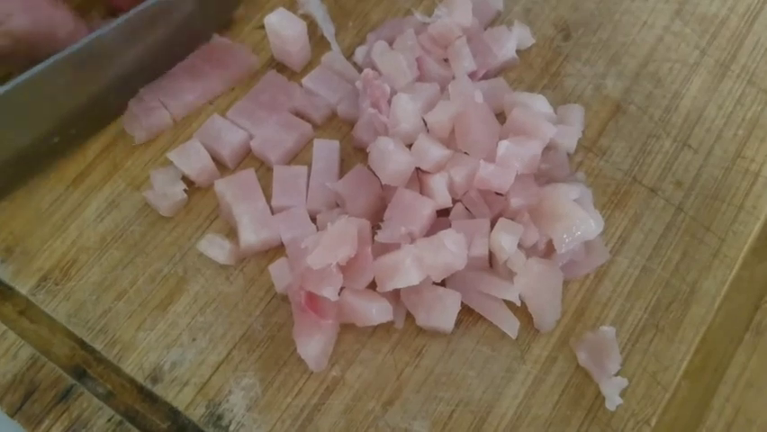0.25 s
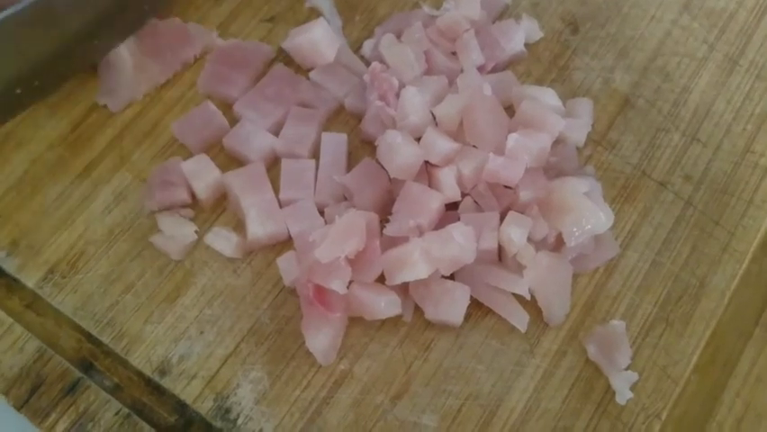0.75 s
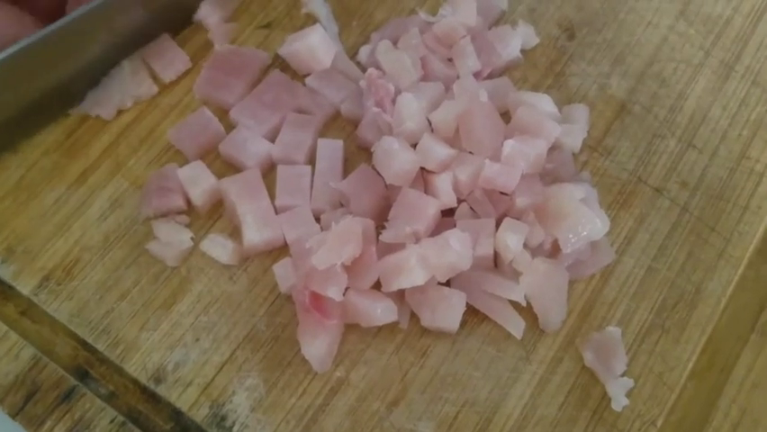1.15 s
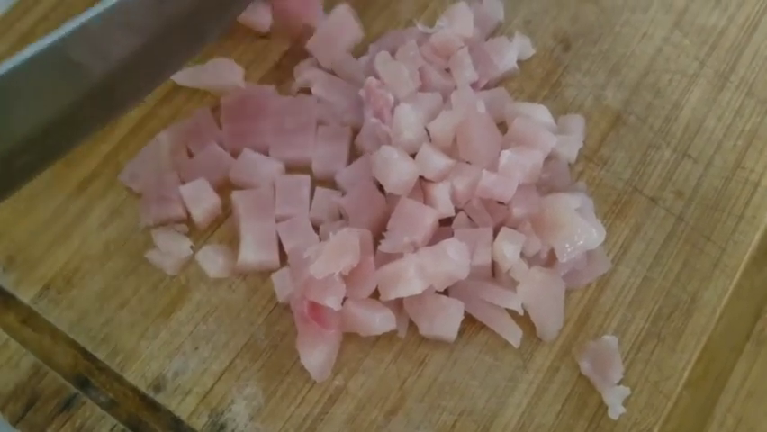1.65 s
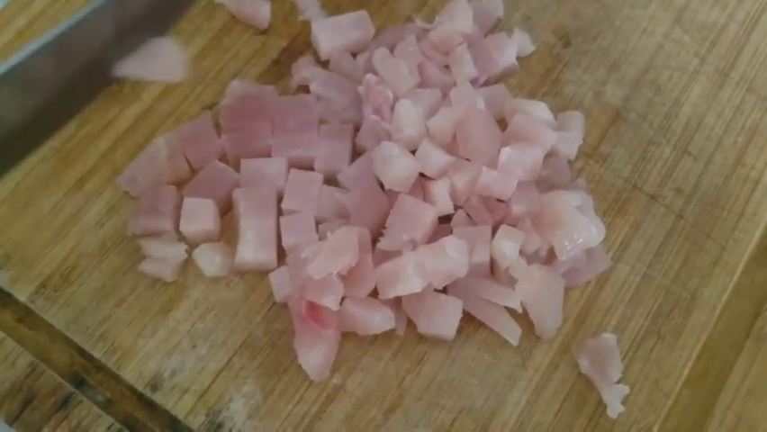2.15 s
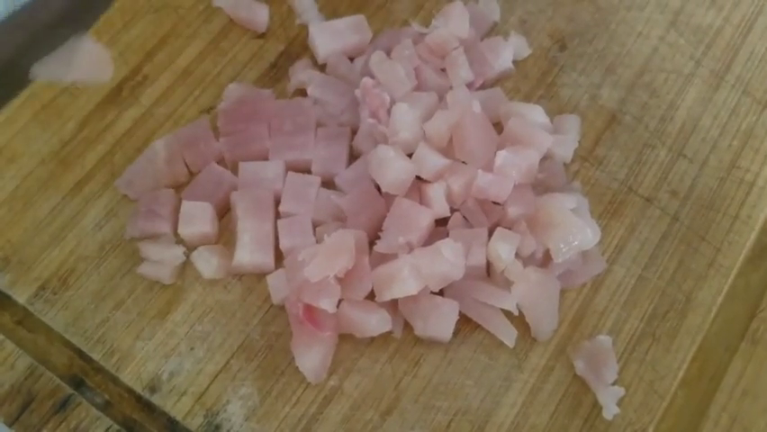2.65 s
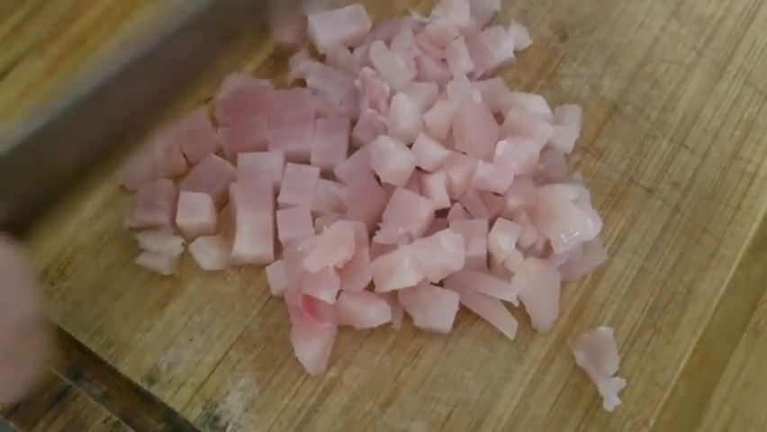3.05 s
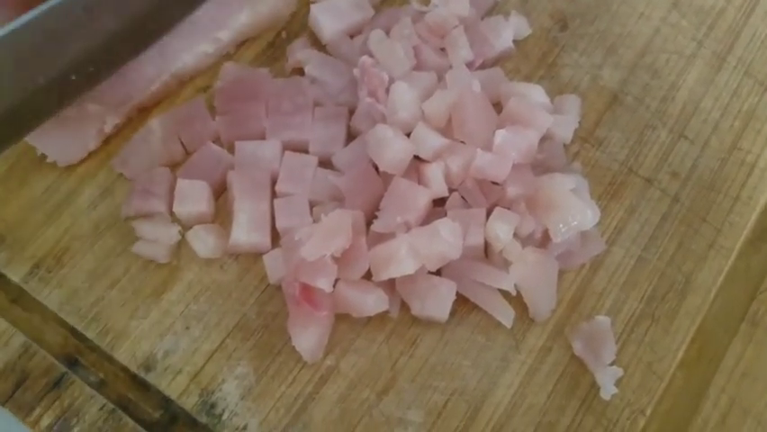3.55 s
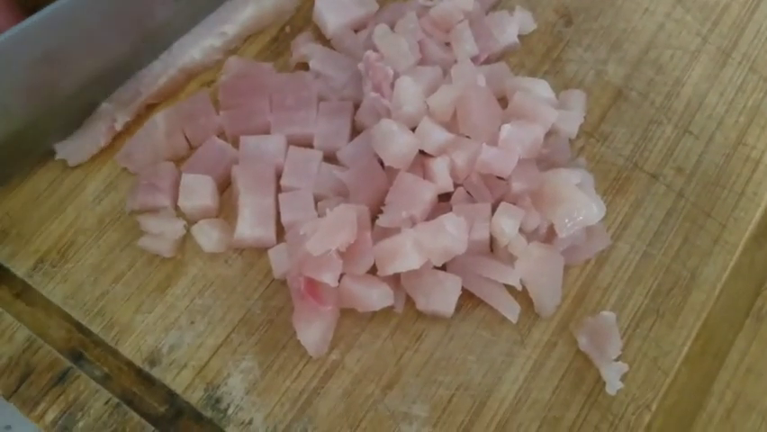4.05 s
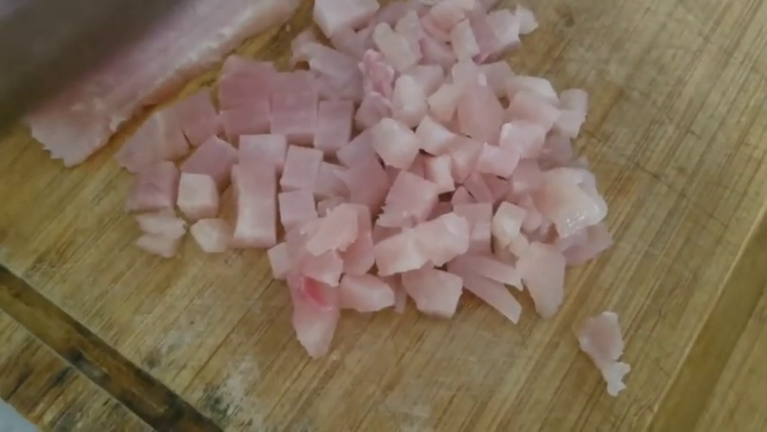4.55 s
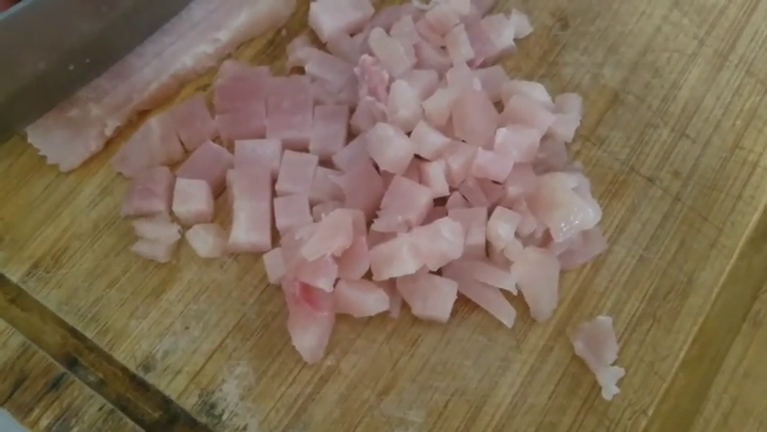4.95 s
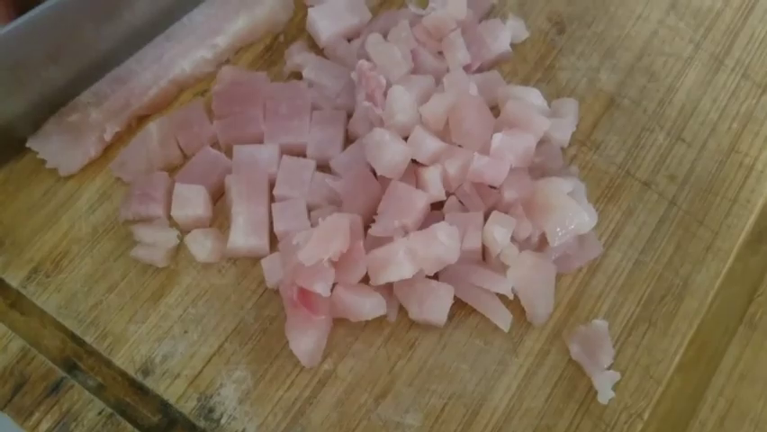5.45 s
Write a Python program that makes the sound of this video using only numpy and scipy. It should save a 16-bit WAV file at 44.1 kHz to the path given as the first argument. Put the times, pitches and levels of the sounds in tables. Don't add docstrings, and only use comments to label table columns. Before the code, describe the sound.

Very close stereo pickup of a knife cutting raw meat on a wooden board in a small kitchen. Light slides and taps come first, a firm chop near two seconds, smaller ones after it, then a near-quiet lull. Two loud woody knocks follow around four and five seconds, each led in by a rasping, wet drag. Low appliance rumble, thin hiss and a faint far bird stay behind.

```python
import sys
import numpy as np
from scipy import signal
from scipy.fft import rfft, irfft, next_fast_len
from scipy.io import wavfile
from scipy.ndimage import uniform_filter1d, minimum_filter1d

SR = 44100
rng = np.random.default_rng(int(sys.argv[2]) if len(sys.argv) > 2 else 0)


def ratio(d):
    e = np.asarray(d, float) / 20
    return 10 ** e


def to_wav(sig):
    pcm = np.clip(np.atleast_2d(sig), -1, 1) * 32767
    pcm = np.round(pcm).astype(np.int16)
    wavfile.write(sys.argv[1], SR, pcm.T)


N = 250840


def evened(x):
    return x / np.sqrt(np.mean(x ** 2) + 1e-20)


def read(points, hz):
    f, value = np.transpose(points)
    return np.interp(np.log(hz + 1), np.log(f + 1), value)


def add(mix, s, sound):
    part = mix[..., round(s * SR):][..., :sound.shape[-1]]
    part += sound[..., :part.shape[-1]]


def noise_pair(count, likeness, level_db, size=512):
    hz = np.fft.rfftfreq(size, 1 / SR)[:, None]
    t = np.arange(count * 4 // size + 5) * size / 4 / SR
    a, b, c, d = rng.standard_normal((len(t), len(hz), 4)).T
    same = np.clip(read(likeness, hz), -1, 1)
    left = a + 1j * b
    right = same * left + np.sqrt(1 - same ** 2) * (c + 1j * d)
    spectra = np.array([left, right]) * ratio(level_db(hz, t))
    return signal.istft(spectra, nperseg=size, noverlap=size * 3 // 4)[1][:, :count]


# f/Hz, level/dB per Hz
AIR_COLOUR = [(25, -4.5), (50, 0.5), (75, 0), (150, -3.5), (300, -3), (450, -7.5), (600, -11.5),
              (1500, -14), (2500, -18), (3700, -26.5), (5500, -25), (7500, -19), (9200, -31.5),
              (15500, -25.5)]
# f/Hz, likeness (-1 to 1)
AIR_LIKENESS = [(60, 1), (130, 0.89), (290, 0.91), (640, 0.097), (1410, -0.28), (3100, 0.22), (6820, -0.15),
                (15000, 0.11)]
# f/Hz, width/Hz, left level/dB over the air, right level/dB over the air
HUM_BANDS = [(100.9, 20.4, 12, 15), (192, 30, -0.5, 7), (397.4, 43, 9, 9.5), (443, 29, 3.5, 13),
             (4420, 1100, 3.5, 3), (4870, 410, 6, 7.5), (5930, 71, -9, 7), (7053, 317, 5, 13.5),
             (8800, 230, 7, 7), (10900, 1570, 7, 20), (11500, 224, -25, -15), (12600, 1200, 1, 8),
             (14200, 380, 0, 7.5), (14660, 600, 0, 13.5)]


def air():
    def level_db(hz, t):
        f, width, *lift = np.transpose(HUM_BANDS)
        bands = (np.array(lift)[:, None] / (1 + (2 * (hz - f) / width) ** 2)).sum(axis=2)
        patches = uniform_filter1d(rng.standard_normal((len(t), len(hz))), size=10, axis=0)
        waver_db = 1.57 * evened(uniform_filter1d(patches, size=12, axis=1)).T
        return read(AIR_COLOUR, hz) + bands[:, :, None] + waver_db

    pair = noise_pair(count=N, likeness=AIR_LIKENESS, level_db=level_db, size=2048)
    return ratio(-46.5) * evened(pair)


# t/s, length/s, first f/Hz, last f/Hz, level/dB
WHISTLES = [(0.094, 0.12, 4420, 4500, -66), (0.668, .16, 4470, 4370, -68),
            (1.367, 0.085, 4170, 4420, -64.5), (1.46, 0.089, 4460, 4500, -65.5),
            (2.54, .06, 4200, 4230, -66), (3.09, .07, 4540, 4540, -69), (3.3, .12, 4180, 4250, -64),
            (3.45, .2, 4350, 4540, -66), (3.537, 0.16, 5930, 6230, -65), (4.2, .16, 4420, 4500, -71),
            (4.68, .12, 5420, 5560, -68)]


def bird():
    out = np.zeros(N)
    for s, length, first_hz, last_hz, db in WHISTLES:
        hz = np.linspace(first_hz, last_hz, round(length * SR))
        flutter_db = 2.5 * evened(uniform_filter1d(rng.standard_normal(len(hz)), size=900))
        tone = np.sin(2 * np.pi * np.cumsum(hz) / SR)
        add(out, s, ratio(db + flutter_db) * tone * signal.windows.tukey(len(hz), .3))
    return out


# f/Hz, likeness (-1 to 1)
NEAR_LIKENESS = [(60, .97), (200, .85), (400, .65), (850, .88), (1300, .65), (2400, -.2), (4400, .1),
                 (15000, .05)]
# f/Hz, fade time/s
ROOM_FADE = [(150, 0.23), (400, 0.34), (900, 0.19), (2000, 0.28), (5000, 0.25), (12000, 0.098)]


def kitchen(gap_s=.003):
    def fade_db(hz, t):
        return -60 * t / read(ROOM_FADE, hz)

    tail = noise_pair(count=16000, likeness=NEAR_LIKENESS, level_db=fade_db, size=256)
    return np.pad(tail / np.linalg.norm(tail[0]), ((0, 0), (round(gap_s * SR), 0)))


def echo(sound, room, db):
    return ratio(db) * signal.oaconvolve(sound.mean(axis=0)[None], room, axes=1)[:, :N]


# t/s, level/dB, f/Hz,
# length/ms
SNAPS_AND_SQUEAKS = [(.868, -45, 13600, 12), (.923, -49, 5700, 8), (1.151, -25, 1367, 24), (1.176, -21, 342, 27),
                     (1.192, -23.5, 345, 21), (1.171, -46, 4200, 20), (1.805, -45, 4090, 26),
                     (1.806, -40, 12600, 6.5), (1.806, -44, 15200, 6), (1.819, -47, 4250, 20),
                     (1.819, -39, 12600, 8.7), (1.82, -22, 16700, 13), (2.956, -46, 5900, 6),
                     (2.413, -44, 14500, 4), (2.224, -47, 3050, 9), (3.015, -47, 12400, 18),
                     (3.195, -54, 12500, 15), (3.353, -48, 12900, 12), (3.56, -57, 11500, 12)]


def snaps():
    out, t = np.zeros((2, N)), np.arange(4000) / SR
    for s, db, hz, ms in SNAPS_AND_SQUEAKS:
        noise = rng.standard_normal((2, len(t)))
        puff = 0.99 + evened(uniform_filter1d(noise, size=int(8 * SR / hz)))
        onset = np.minimum(t * hz / 4, 1)
        fade = ratio(db - 20 * 1000 * t / ms)
        add(out, s, fade * onset * puff * np.sin(2 * np.pi * hz * t))
    return out


# t/s, level/dB, highest f/Hz
EDGE_TICKS = [(0.441, -58, 3000), (1.7907, -36, 4500), (2.168, -33.5, 5240), (2.224, -63, 4000),
              (2.4123, -35, 4600), (3.193, -51, 4500), (3.2516, -45.5, 3600), (3.56, -58, 4000),
              (3.895, -28.5, 4200), (4.474, -45, 4000), (4.8, -41, 4140)]


def ticks(room):
    out, t = np.zeros((2, N)), np.arange(1200) / SR
    for s, db, top_hz in EDGE_TICKS:
        crack = rng.standard_normal((2, len(t))) * ratio(-60 * t / 0.041)
        crack = signal.sosfilt(signal.butter(3, [2500, top_hz], "band", fs=SR, output="sos"), crack)
        add(out, s - .0005, ratio(db + 5.5) * crack / abs(crack).max())
    return out + echo(out, room, db=-7)


# f/Hz, level/dB, time to fade by 60 dB/s, left-right level/dB
BOARD_MODES = [(100.4, -9.5, 0.2, -5), (194.4, -3, 0.15, 4), (264, 5, 0.063, -9.5), (342.3, 8, 0.081, 6),
               (404, -1.5, 0.18, -13), (635, -15, .07, 3), (785, -8, .06, 3), (852, -4, .13, 4),
               (884, -3, .12, 3), (1000, -10, .06, -2), (1240, -27, 0.065, 2), (1287, 10, 0.01, 16.5),
               (1422, 9, 0.026, -3), (1503, 1, 0.046, 19), (1698, 1.5, 0.036, -15),
               (1789, -4.5, 0.037, -10.5), (2077, 3, 0.009, 21.5), (2353, -8.5, 0.03, -6.5)]
GROUP_TOPS = [550, 1100, 1780]


def board(spot_db):
    hz, db, t60, pan = np.transpose(BOARD_MODES)[:, :, None]
    t = np.arange(8000) / SR
    lag = np.array([0, .00005])[:, None, None]
    sides = ratio(np.array([.5, -.5])[:, None, None] * pan)
    fade = ratio(db + spot_db[:, None] - 60 * t / t60)
    rings = fade * np.sin(2 * np.pi * hz * np.maximum(t - lag, 0))
    flips = (-1) ** np.arange(len(hz))[:, None]
    rings *= np.where(hz > GROUP_TOPS[1], flips, 1)
    member = np.searchsorted(GROUP_TOPS, hz[:, 0]) == np.arange(4)[:, None]
    return -np.einsum("gm,cmt->gct", member, sides * rings)


# hardest t/s, pressure level/dB, lean-in/s, let-go/s, wetness level/dB
BLADE_STROKES = [(.1, -44, .11, 0.044, -8), (.25, -51.5, 0.044, 0.026, 13), (.868, -51, 0.031, 0.027, 10),
                 (.95, -41, 0.1, 0.076, -8), (1.085, -42.5, 0.072, 0.11, -9),
                 (1.174, -31, 0.041, 0.044, -2), (1.785, -44, 0.032, .01, -8),
                 (1.795, -34.5, 0.0088, .015, 3), (1.81, -42, .012, 0.059, 6),
                 (2.166, -48.5, 0.027, 0.036, -8), (2.228, -49, 0.015, 0.0098, 0),
                 (2.393, -49, 0.0086, 0.026, 6), (3.21, -62, 0.059, .03, 9), (3.255, -53.5, 0.04, 0.13, -4),
                 (3.825, -38.5, 0.092, 0.067, 1.5), (3.891, -30.5, 0.091, 0.031, -1.5),
                 (4.056, -36, 0.075, .14, -2), (5.02, -42.5, 0.082, .05, 3),
                 (5.081, -29.5, 0.13, 0.048, -5.5), (5.253, -37.5, 0.16, .15, -5)]


def pressure():
    rub_db = -59.5
    t, level = np.arange(N) / SR, np.zeros((4, N))
    for s, db, lean, let_go, wet_db in BLADE_STROKES:
        on = (t > s - 2 * lean) & (t < s + 2 * let_go)
        away = np.where(t[on] < s, (s - t[on]) / lean, (t[on] - s) / let_go)
        tops_db = [db,
                   rub_db + 0.21 * (db - rub_db),
                   db - 6 + 0.16 * wet_db,
                   db - 8.5 + wet_db]
        swell_db = 22.5 * away ** 1.245
        level[:, on] += ratio(2 * (np.array(tops_db)[:, None] - swell_db))
    return np.sqrt(level)


# f/Hz, level/dB per Hz
RASP_COLOUR = [(1900, -40), (2500, 2.5), (3000, 3.5), (3500, 4.5), (4000, 1.5), (5000, -4.5), (6000, -2.5),
               (7200, -5.5), (8000, -4.5), (9000, -20)]
# f/Hz, width/Hz, level/dB
BLADE_MODES = [(3110, 170, -1), (3530, 120, 0), (4200, 120, -2), (4800, 120, -3), (5160, 150, -1),
               (5950, 200, -1.5), (7640, 260, -4.5)]


def rasp_db(hz, t):
    lift_db, chatter_db = 5, 2.5
    f, width, top_db = np.transpose(BLADE_MODES)
    patches = uniform_filter1d(rng.standard_normal((len(t), len(hz))), size=6, axis=0)
    patches = uniform_filter1d(patches, size=5, axis=1)
    blade = ((lift_db + top_db) / (1 + (2 * (hz - f) / width) ** 2)).sum(axis=1)
    return read(RASP_COLOUR, hz) + blade[:, None] + chatter_db * evened(patches).T


# f/Hz, level/dB per Hz
FIZZ_COLOUR = [(7500, -21), (9300, -1.5), (10500, 1.5), (12700, 6), (14000, 2), (15500, 4)]


def fizz_db(hz, t):
    return read(FIZZ_COLOUR, hz) + 0 * t


def strokes(room):
    level = uniform_filter1d(pressure(), size=220)
    sizes = ratio(2.0 * np.minimum(rng.exponential(1, N), 5))
    happens = rng.random(N) < 1600 / SR
    slips = sizes * happens * rng.choice([-1, 1], N)
    grit = evened(uniform_filter1d(abs(slips), size=40)) + 2.1
    thud, main, upper, top = board(np.zeros(len(BOARD_MODES)))
    ringing = main + ratio(-4.5) * upper + ratio(1.0) * top
    out = 0
    for drive, ring in ((level[0], ringing), (level[1], np.diff(thud))):
        push = (drive * evened(slips))[None]
        out = out + signal.oaconvolve(push, ring / np.linalg.norm(ring[0]), axes=1)[:, :N]
    for drive, colour_db in ((level[2], rasp_db), (level[3], fizz_db)):
        hiss = noise_pair(count=N, likeness=NEAR_LIKENESS, level_db=colour_db)
        out = out + drive * evened(grit) * evened(hiss)
    return out + echo(out, room, db=-8)


# t/s, blow level/dB, then thud, upper modes and top modes as level/dB over the blow
EDGE_CHOPS = [(0.441, -43, -3, -6.5, -4), (1.7916, -11.5, -10, -6.5, -12), (2.168, -35, -3, -6.5, -10),
              (2.224, -48.5, 10, 3, 6), (2.414, -20.5, -4.5, -11.5, -17), (3.192, -55.5, 17.5, -5, 3),
              (3.253, -54.5, -20, 9, 9), (3.285, -54, 14, 3, 0), (3.56, -56, 5, -3, 4),
              (3.895, -2, -17, -14.5, -10.5), (5.086, 1.5, -17.5, -15.5, -13)]
# t/s, blow level/dB, thud level/dB, brightness level/dB, landing/ms
SOFT_BUMPS = [
    (0.082, -40, -19, -16, 0.77),
    (0.107, -36, 1.5, -12, 1.3),
    (.884, -24.5, -22, -32, 2.1),
    (1.069, -14, -33, -27, 7.6),
    (1.099, -19.5, -29, -26, 3.1),
    (2.19, -51, -4, 6, 1.2),
    (4.477, -27.5, 5.5, -15.5, 1.5),
    (4.801, -38, 15, -4, 1.1),
]


def knocks(room):
    out, ms = np.zeros((2, N)), np.arange(8000) * 1000 / SR
    hard = [(*row, 0.65) for row in EDGE_CHOPS]
    soft = [(s, db, thud, bright, bright + 3.5, land) for s, db, thud, bright, land in SOFT_BUMPS]
    blows = sorted(hard + soft)
    spots = rng.standard_normal((len(blows), len(BOARD_MODES)))
    bending = signal.butter(3, 600, "high", fs=SR, output="sos")
    for (s, db, thud_db, upper_db, top_db, landing_ms), spot in zip(blows, spots):
        landing = 1 - np.exp(-(ms / landing_ms) ** 2)
        first_wave = 1 + 2.6 * np.exp(-landing_ms / 5 - (ms / (landing_ms + 3.3)) ** 4)
        thud, main, upper, top = board(1.2 * spot) * landing * .25
        bend = (main + ratio(upper_db) * upper + ratio(top_db) * top) * first_wave
        add(out, s - .0008, ratio(db) * (ratio(thud_db) * thud + signal.sosfilt(bending, bend)))
    return out + echo(out, room, db=-9)


def scene():
    room = kitchen()
    return air() + bird() + snaps() + ticks(room) + strokes(room) + knocks(room)


def low_pass(x):
    return signal.sosfilt(signal.butter(12, 16610, fs=SR, output="sos"), x)


# f/Hz, left-right level/dB
PORT_BALANCE = [(60, -1.5), (300, 2), (2000, -4), (3500, -2), (4300, -8.5), (7200, -12.5), (8500, 1),
                (16000, 2.5)]


def record(dry):
    size = next_fast_len(N + 4096)
    hz = np.fft.rfftfreq(size, 1 / SR)
    treble_cut_db = np.clip(hz - 15780, 0, 60)
    bass_cut_db = 10 * np.log10(1 + (45 / (hz + 1)) ** 4)
    sides_db = np.array([[.5], [-.5]]) * read(PORT_BALANCE, hz)
    heard = irfft(rfft(dry, size) * ratio(sides_db - treble_cut_db - bass_cut_db), size)[:, :N]
    peak = -minimum_filter1d(-abs(heard).max(axis=0), size=88)
    squeeze = uniform_filter1d(np.minimum(1, .7 / peak) ** .7, size=44)
    return low_pass(heard * squeeze)


dry = scene()
out = record(dry)
to_wav(out)
```